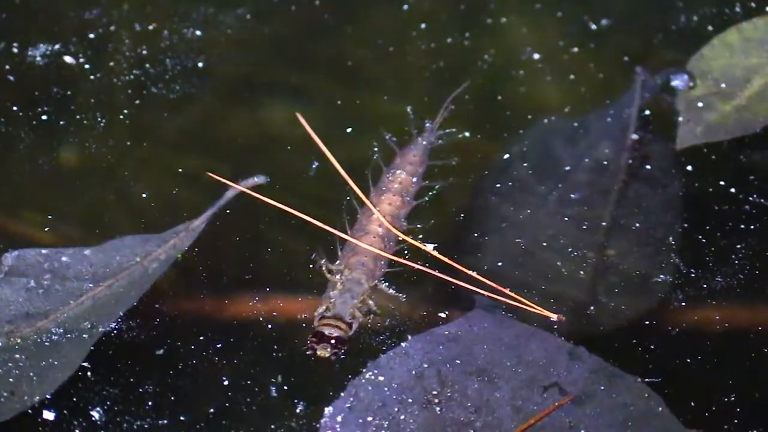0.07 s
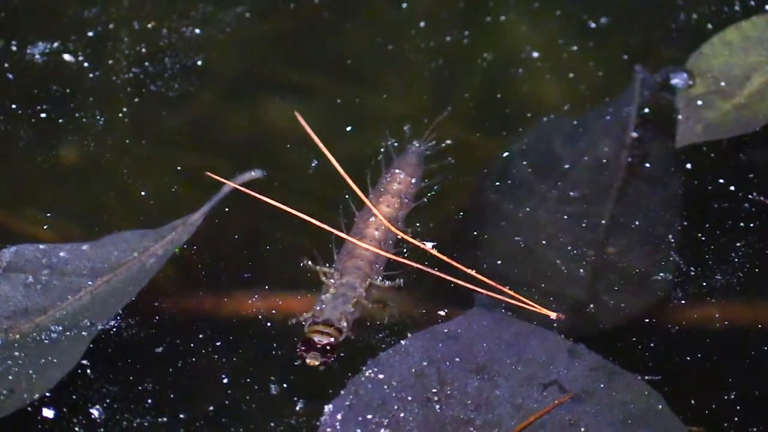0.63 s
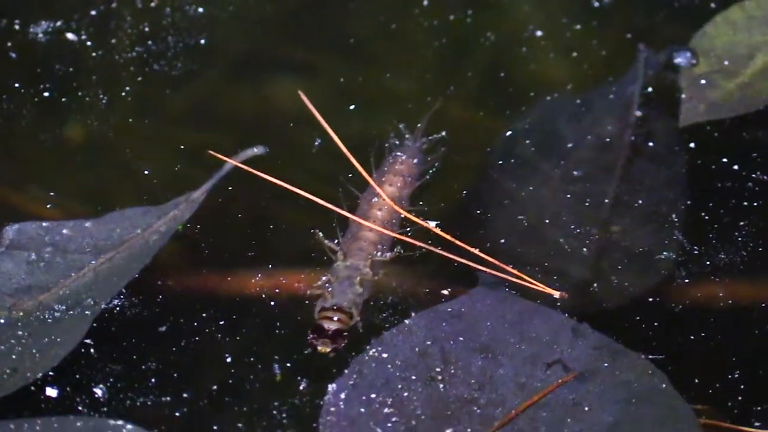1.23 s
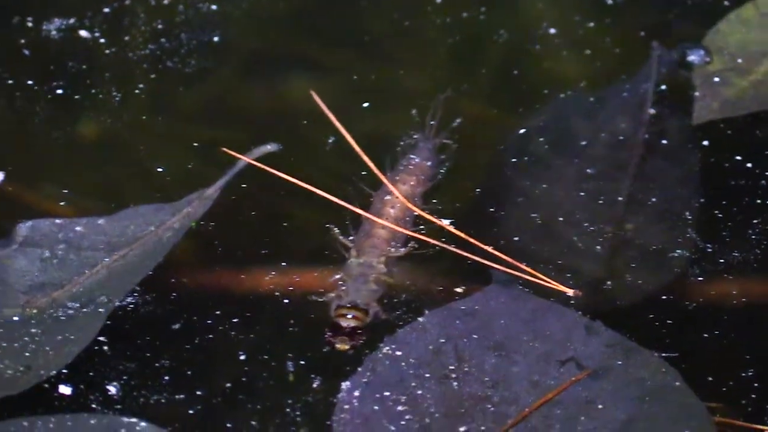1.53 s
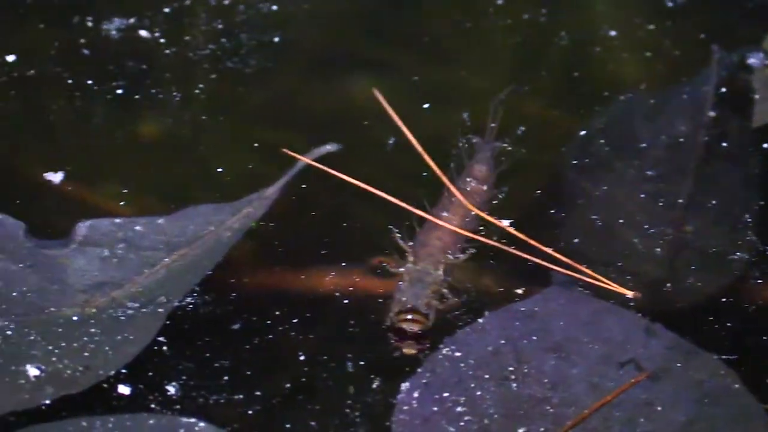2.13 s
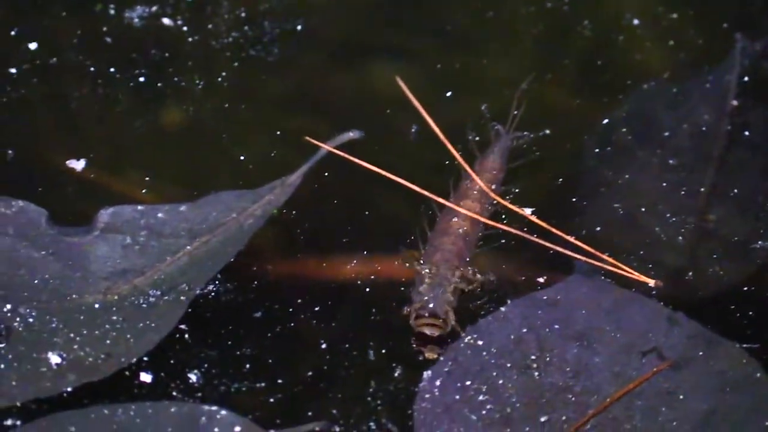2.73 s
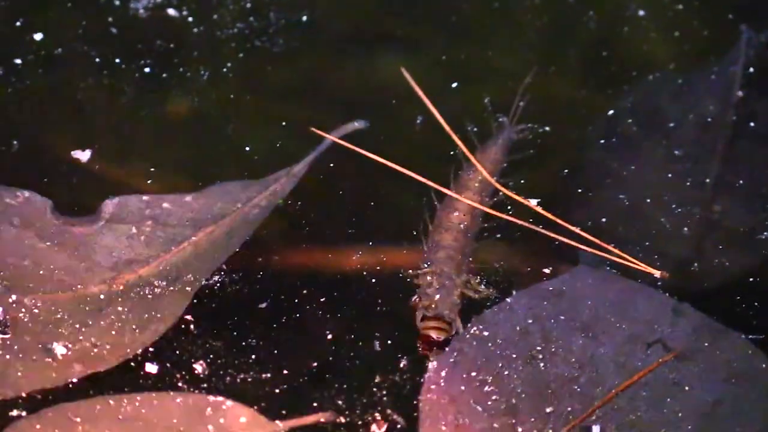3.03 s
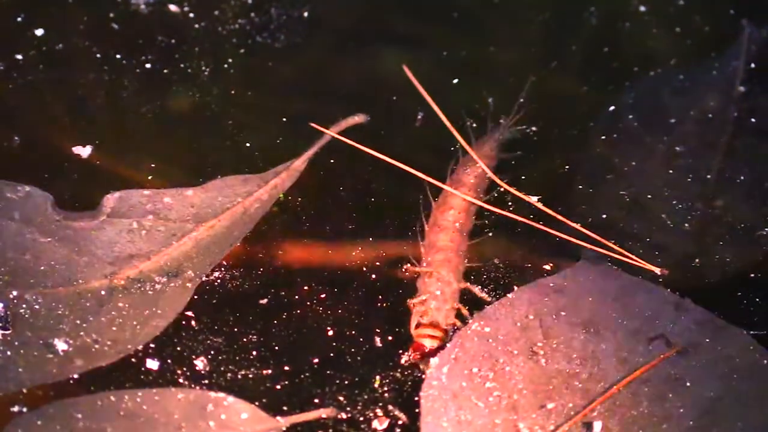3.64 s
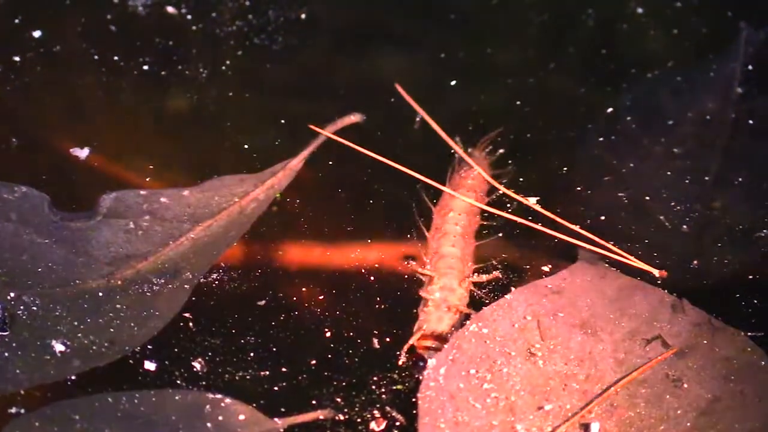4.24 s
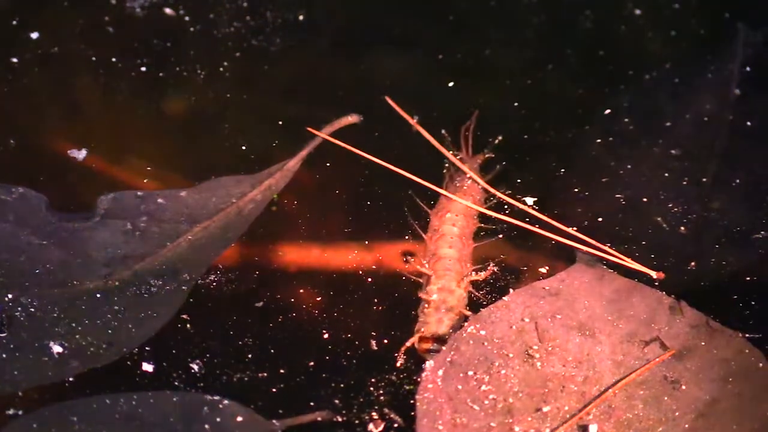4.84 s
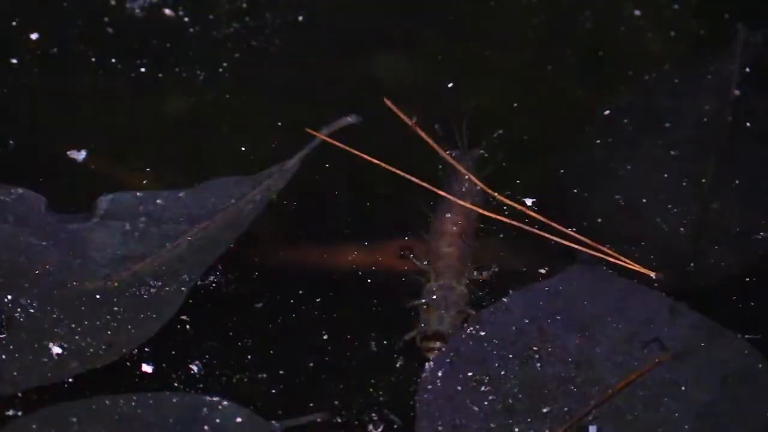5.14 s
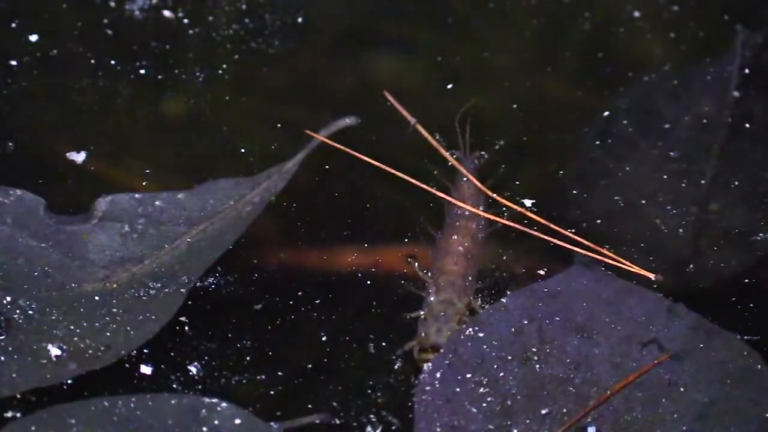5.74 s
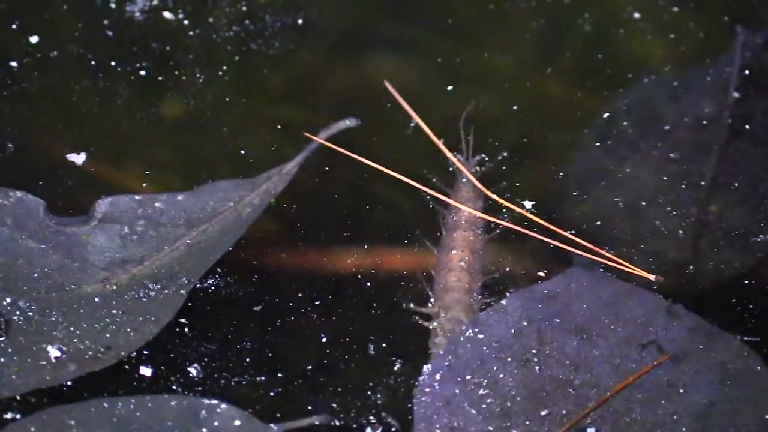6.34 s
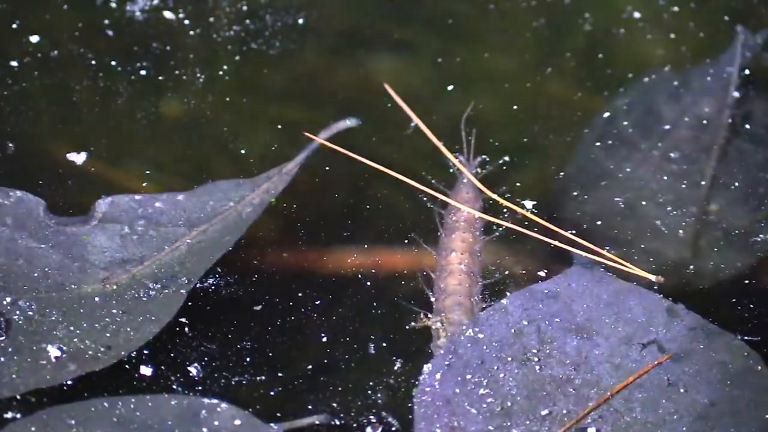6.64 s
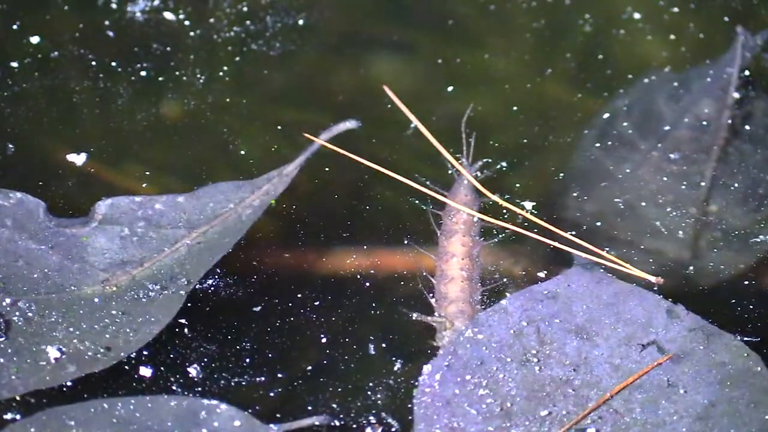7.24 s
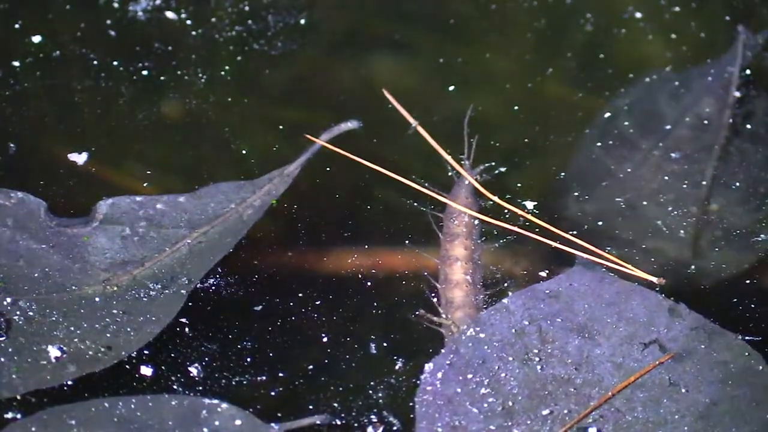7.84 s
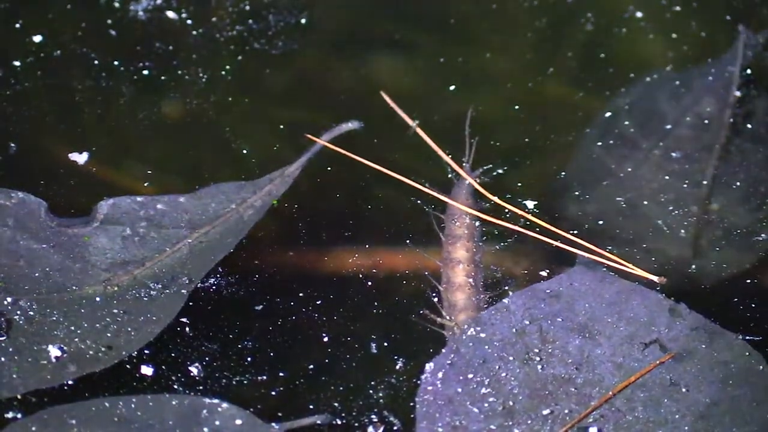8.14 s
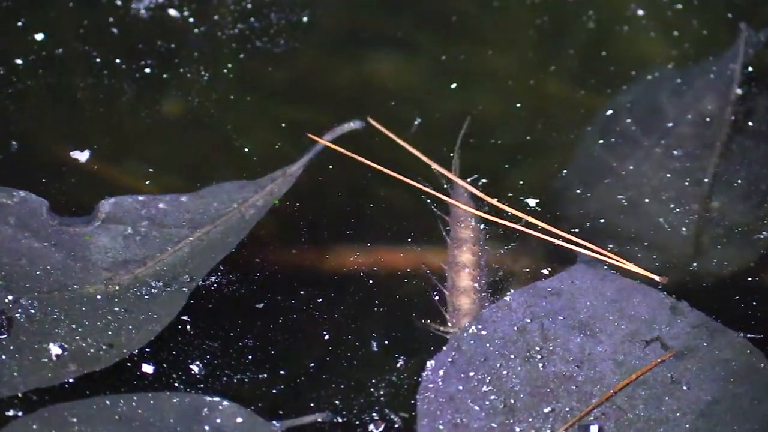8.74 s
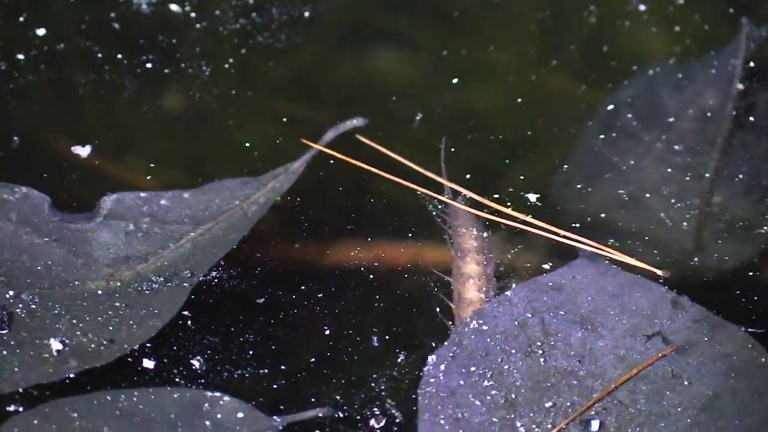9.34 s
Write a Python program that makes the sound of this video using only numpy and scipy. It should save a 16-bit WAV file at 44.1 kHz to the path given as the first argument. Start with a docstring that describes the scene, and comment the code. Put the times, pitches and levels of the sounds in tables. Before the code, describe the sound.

At a woodland pond at night, two frogs on the right trade short, high, rising whistles, each echoing briefly among the trees. A distant frog chorus shimmers steadily behind them over a faint murmur of air. Close to the microphone, cloth and dry leaves rustle, and a stick snaps sharply early on. In the second half only the louder frog keeps calling, while soft handling knocks and twig ticks gather.

```python
"""A far chorus of spring peepers shimmers over still night air at a woodland pond. A sleeve brushes dry
leaves close by, then two peepers trade calls on the right. Each peep is a rising whistle from the vocal
cords, radiated by the throat sac and scattered back by the trees. Cloth and leaf litter keep rustling,
with one sharp snap of a stick, soft handling knocks and, later, small ticks of twigs."""
import sys
import numpy as np
from scipy import signal
from scipy.fft import rfft
from scipy.io import wavfile

SR = 44100
rng = np.random.default_rng(int(sys.argv[2]) if len(sys.argv) > 2 else 0)


def int16_out(signal):
    """Quantize to a 16-bit WAV file."""
    q = np.round(np.clip(np.atleast_2d(signal).T, -1, 1) * 32767)
    wavfile.write(sys.argv[1], SR, q.astype(np.int16))


N = 413658
TIME = np.arange(N) / SR

# Colours of the air's murmur and hiss, of rubbing cloth and of crinkling leaves.
# Each row: frequency in Hz, relative level per Hz in dB.
MURMUR_SPECTRUM = [(22, -29), (45, -12), (75, -0.5), (110, 0.5), (145, -3.5), (190, 0.5), (250, -3),
                   (330, -2.5), (450, -5), (600, -2.5), (850, -1), (1400, -6.5), (2300, -14)]
HISS_SPECTRUM = [(2000, -8), (4000, -6.5), (6000, -7), (9500, -17), (12000, -13.5), (15800, -20.5)]
CLOTH_SPECTRUM = [(90, -22), (170, -8.5), (380, -1), (550, -3), (1000, -8.5), (1400, -6), (2400, -6.5),
                  (4000, -15.5), (5500, -31.5)]
LEAF_SPECTRUM = [(2800, 2), (4400, 4), (5900, -2), (8000, 2), (9800, -1.5), (11500, -15), (15800, -28)]
# Stereo width. Each row: frequency in Hz, left-right likeness from 0 (wide) to 1 (mono).
AIR_LIKENESS = [(30, .2), (60, 0.79), (120, 1), (300, 0.73), (700, 0.47), (1500, 0.37), (7000, 0.5),
                (15000, .4)]
RUSTLE_LIKENESS = [(100, 0.94), (300, 0.96), (1200, 0.61), (7000, 0.74), (15000, 0.38)]
# Level rides for the chorus, the faint constant fidgeting and the closing fade.
# Each row: time in seconds, gain in dB.
CHORUS_RIDE = [(0, -30.5), (1.3, -30), (2.1, -32.5), (3, -30.5), (4.8, -32.5), (6, -32), (7.5, -31.5),
               (9.3, -30.5)]
FIDGET_RIDE = [(0, -48.5), (1.4, -46.5), (2.1, -49.5), (3.3, -43), (6.9, -42), (7.55, -46.5), (8.2, -45),
               (9.3, -43)]
FADE = [(8.6, -1), (8.9, -3.5), (9.2, -9), (9.38, -14)]
# A sleeve sweeps the leaves. Each row: start and length in seconds, cloth and leaf gains in dB.
BRUSHES = [(0.146, 0.11, -42, -55.5), (0.883, 0.18, -35.5, -51), (1.533, 0.13, -36, -55),
           (2.4, 0.27, -46.5, -55.5), (3.183, .025, -36, -51), (3.342, 0.13, -38.5, -46.5),
           (3.669, 0.065, -39.5, -46), (3.946, 0.4, -41.5, -50.5), (4.743, 0.07, -36, -50),
           (5.036, 0.15, -35, -49), (5.521, 0.087, -26, -39.5), (5.662, 0.26, -33, -42.5),
           (5.988, 0.47, -37, -51), (6.288, 0.24, -30.5, -46.5), (6.624, 0.35, -32, -44),
           (8.42, 0.085, -35.5, -54.5), (8.66, 0.047, -42, -52)]

# Calls of the near frog and its slightly higher rival.
# Each row: start and length in seconds, bottom and top of the rise in Hz, level in dB before the push.
RIVAL_PEEPS = [(.564, 0.21, 2782, 3070, -8.5), (2.514, 0.23, 2765, 3063, -8), (4.285, .215, 2770, 3063, -8)]
NEAR_PEEPS = [(.894, 0.23, 2698, 2975, -2.5), (2.269, 0.24, 2715, 2975, -2.5),
              (3.630, 0.24, 2687, 2973, -2), (5.039, 0.24, 2742, 2990, -1.5), (6.507, .228, 2721, 2984, -2),
              (8.057, 0.23, 2729, 2965, -2)]
# The upward bend of a peep. Each row: share of the length, share of the rise.
GLIDE = [(0, 0), (.22, .28), (.4, .52), (.58, .76), (.76, .94), (.9, 1), (1, .98)]
# The push of air through a peep. Each row: share of the length, gain in dB.
RIVAL_PUSH = [(0, 0.5), (.14, 2.5), (.36, 3), (.6, -1.5), (.85, 0.5), (1, -15)]
NEAR_PUSH = [(0, -6), (.12, -3), (0.251, -2.5), (.46, 1.5), (.72, -0.5), (.92, -1.5), (0.999, -17.5)]
# What the sac radiates of the cords' other harmonics. Each row: frequency in Hz, dB against the whistle.
RIVAL_SAC = [(1450, -33.5), (2600, 5.5), (3200, 5), (4150, -34), (5700, -35.5), (6200, -30.5), (7000, -48),
             (7700, -34), (8700, -51.5), (10200, -57.5), (11300, -50.5), (12700, -42), (13900, -57)]
NEAR_SAC = [(1450, -39.5), (2600, -0.5), (3200, 1.5), (4100, -35.5), (4500, -35), (5700, -46.5),
            (7200, -44), (8600, -56), (10200, -56.5), (11800, -57.5), (13400, -73)]
# Slaps off bank and trunks. Each row: delay in seconds, left and right gains in dB.
RIVAL_ECHOES = [(0.045, -11.5, -14), (.097, -35, -21.5), (.123, -32, -15.5), (0.15, -22.5, -20.5)]
NEAR_ECHOES = [(0.068, -20, -29.5), (0.088, -36.5, -29), (.108, -30, -30)]

# One stick snaps; twigs and leaves tick.
# Each row: start in seconds, relative level in dB, blunt push in dB against the click.
SNAP = [(1.6938, 5, -6)]
TICKS = [(4.5248, -29.5, -3), (5.0626, -28, -2), (5.535, -22.5, -7), (5.8835, -29, -1), (6.0617, -34, -3),
         (6.446, -18, 6), (6.5169, -22, -5), (6.7521, -19.5, 2), (6.8922, -27, -1), (6.9537, -26, -5),
         (8.1257, -21.5, 4)]
# The ring of breaking wood. Each row: frequency in Hz, gain in dB, seconds to fall 60 dB.
TWIG_MODES = [(710, -27, 0.0047), (1300, -25, 0.0017), (2450, -5, 0.0026), (4440, -5, 0.0022),
              (5580, -8.5, 0.0018), (7600, -5, 0.0021), (10040, -10, 0.0023), (12800, -30, .001)]
# Soft handling knocks; the first row is the dull thud of the snapping stick's body. Each row: start in seconds,
# thud gain in dB, pitch in Hz, contact gain in dB.
KNOCKS = [(1.6943, -23.5, 258, -26), (3.2105, -21, 380, -12), (4.7856, -24, 250, -12.5),
          (4.998, -21, 353, -35), (5.0634, -18, 490, -14), (5.491, -24, 196, -25), (5.536, -22, 375, -21),
          (5.560, -14.5, 290, -28), (5.568, -17, 178, -19), (5.576, -17, 333, -29),
          (5.6207, -20.5, 328, -14), (6.137, -18, 870, -28), (6.349, -16, 415, -17), (6.446, -14, 890, -16),
          (6.462, -19, 430, -28), (6.752, -11, 1170, -18), (6.790, -18, 446, -24), (6.877, -23, 366, -28),
          (7.383, -19.5, 1620, -28), (9.149, -19, 350, -35)]


def from_db(db):
    """Decibels to gain."""
    return 10 ** (np.asarray(db) / 20)


def rms_one(x):
    """Scale to unit rms."""
    return x / np.sqrt(np.mean(x ** 2) + 1e-20)


def along(curve, at):
    """Read a curve whose points are joined by straight lines."""
    return np.interp(at, *np.transpose(curve))


def at_hz(curve, hz):
    """Read a curve on a log-frequency axis."""
    points_hz, values = np.transpose(curve)
    return np.interp(np.log(hz), np.log(points_hz), values)


def pan(right_db):
    """Left and right gains, with the right louder by right_db."""
    return from_db(np.array([[-.5], [.5]]) * right_db)


def band(x, low_hz, high_hz):
    """Butterworth band-pass."""
    sos = signal.butter(2, [low_hz, min(high_hz, .45 * SR)], "band", fs=SR, output="sos")
    return signal.sosfilt(sos, x)


def drift(rate_hz):
    """A random wander of about unit size that turns rate_hz times a second."""
    knots = rng.standard_normal(4000)
    return np.interp(TIME * rate_hz, np.arange(len(knots)), knots)


def add(track, start_s, sound):
    """Mix a sound into a track from start_s on."""
    i = int(np.clip(round(start_s * SR), 0, track.shape[-1] - 1))
    track[..., i:i + sound.shape[-1]] += sound[..., :track.shape[-1] - i]


def grainy_noise(spectrum, likeness, flicker_db, grain_db):
    """Stereo noise in narrow bands that flicker on their own and share millisecond grains; rms 1."""
    grain_sizes = np.minimum(rng.exponential(1, N // 32 + 1), 6)
    grains = np.repeat(from_db(grain_db * grain_sizes), 32)[:N]
    white = rng.standard_normal((2, 2, N)) * grains
    mid_side, edges_hz = 0, np.geomspace(22, 16000, 27)
    for k, (low, high) in enumerate(zip(edges_hz, edges_hz[1:])):
        hz = np.sqrt(low * high)
        if spectrum[0][0] <= hz <= spectrum[-1][0]:
            alike = at_hz(likeness, hz)
            gain = from_db(at_hz(spectrum, hz) + flicker_db * drift(25))
            mid_side += gain * band(white[k % 2], low, high) * np.sqrt([[1 + alike], [1 - alike]])
    mid, side = mid_side
    return rms_one(np.array([mid + side, mid - side]))


def night_air(murmur_db=-38, hiss_db=-53):
    """The bed: a soft, even murmur of far wind and a faint hiss."""
    murmur = grainy_noise(MURMUR_SPECTRUM, AIR_LIKENESS, flicker_db=1, grain_db=.5)
    hiss = grainy_noise(HISS_SPECTRUM, AIR_LIKENESS, flicker_db=-3, grain_db=-.5)
    return from_db(murmur_db) * murmur * pan(2.5) + from_db(hiss_db) * hiss * pan(1.5)


def whistle(length, bottom_hz, top_hz, push, edge_s=.011, scoop_hz=350, scoop_s=.003):
    """Pitch and envelope of one peep: it scoops up to its note, then rises as the sac fills."""
    t = np.arange(int(length * SR)) / SR
    hz = bottom_hz + (top_hz - bottom_hz) * along(GLIDE, t / length) - scoop_hz * np.exp(-t / scoop_s)
    gate = np.sin(np.pi / 2 * np.clip(np.minimum(t, length - t) / edge_s, 0, 1)) ** 2
    return hz, gate * from_db(along(push, t / length))


def woods(x, t60, build_s, top_hz):
    """Scatter from many trunks blooms and dies away, differently at each ear."""
    t = np.arange(int(1.3 * SR)) / SR
    tail = band(rng.standard_normal((2, len(t))), 300, top_hz)
    tail *= from_db(-60 * t / t60) * (1 - np.exp(-t / build_s))
    peep_band = np.abs(rfft(tail, SR)[:, 2700:3100])
    tail /= np.sqrt(np.mean(peep_band ** 2, axis=1, keepdims=True))   # unit gain at the frogs' pitch
    return signal.fftconvolve(np.atleast_2d(x), tail, axes=1)[:, :N]


def chorus(count=1100, bottom_hz=2860, rise_hz=200, spread_hz=190, uneven_db=3.5, off_pitch_db=-1.84):
    """Hundreds of far peeps, each with its own pitch and distance, blur into a wash among the trees."""
    calls = np.zeros((2, N + SR))
    hz, envelope = whistle(.19, bottom_hz, bottom_hz + rise_hz, NEAR_PUSH)
    for k, (jitter, detune, nearness, side) in enumerate(rng.standard_normal((count, 4))):
        peep = envelope * np.sin(2 * np.pi * np.cumsum(hz + spread_hz * detune) / SR)
        db = uneven_db * np.clip(nearness, -2, 1.5) + off_pitch_db * detune ** 2
        add(calls, (k + jitter) / count * (N / SR + 1), pan(6 * side) * from_db(db) * peep)
    calls = calls[:, SR // 2:SR // 2 + N]   # open with the chorus in full voice
    wash = from_db(-6) * calls + woods(calls, t60=1.0, build_s=.019, top_hz=6000)
    wash += .46 * wash.mean(axis=0)   # narrow the image
    return from_db(along(CHORUS_RIDE, TIME)) * pan(2.6) * rms_one(wash)


def brush(start, length, attack_s=.024, sag_db_per_s=11.5, release_s=.088):
    """Envelope of one sweep of the sleeve: a short swell, a sagging hold, a release."""
    t = np.maximum(TIME - start, 0)
    swell = np.sin(np.pi / 2 * np.minimum(t / attack_s, 1))
    release = np.exp(-np.clip((t - length) / release_s, 0, 20))
    return swell * from_db(-sag_db_per_s * t) * release


def rustle(crinkle_boost_db=5.5, fidget_leaves_db=-12.5):
    """Cloth rubs dully and dry leaves crinkle in fine grains; each brush rises out of the fidgeting."""
    power = from_db(along(FIDGET_RIDE, TIME) + np.array([[0], [fidget_leaves_db]])) ** 2
    for start, length, cloth_db, leaves_db in BRUSHES:
        power += (from_db([[cloth_db], [leaves_db]]) * brush(start, length)) ** 2
    cloth, leaves = np.sqrt(power)
    rub = cloth * grainy_noise(CLOTH_SPECTRUM, RUSTLE_LIKENESS, flicker_db=3, grain_db=3)
    crinkle = leaves * grainy_noise(LEAF_SPECTRUM, RUSTLE_LIKENESS, flicker_db=2.5, grain_db=2)
    return rub * pan(3.3) + from_db(crinkle_boost_db) * crinkle * pan(1.2)


def frog(peeps, push, sac, whistle_left_db, others_left_db, catch_db, catch_s):
    """The cords vibrate an octave under the whistle and rasp for an instant as they catch."""
    out = np.zeros((2, N))
    for start, length, bottom_hz, top_hz, db in peeps:
        hz, envelope = whistle(length, bottom_hz, top_hz, push)
        phase = 2 * np.pi * np.cumsum(hz) / SR
        catch = from_db(catch_db) * np.exp(-(np.arange(len(hz)) / SR / catch_s) ** 2)
        rasp = 1 + catch * np.sin(phase / 3)
        for k in range(1, 10):
            # harmonic 2 is the whistle, much fainter on the left; the others are more even between the ears
            ears = from_db([[whistle_left_db if k == 2 else others_left_db], [0]])
            sac_db = 0 if k == 2 else at_hz(sac, k * hz / 2)
            add(out, start, ears * from_db(db + sac_db) * envelope * rasp * np.sin(k * phase / 2))
    return out


def across_pond(voice, echoes, scatter_db, t60):
    """The direct call, a few dulled echoes, then the tail of the woods."""
    out, dulled = voice.copy(), band(voice[1], 500, 6400)
    for delay, left_db, right_db in echoes:
        add(out, delay, dulled * from_db([[left_db], [right_db]]))
    return out + from_db(scatter_db) * woods(voice[1], t60, build_s=.025, top_hz=5960)


def ring(x, hz, t60):
    """One damped mode of the wood: a unit click rings at height 1."""
    decay, angle = from_db(-60 / (t60 * SR)), 2 * np.pi * hz / SR
    return signal.lfilter([0, np.sin(angle)], [1, -2 * decay * np.cos(angle), decay ** 2], x + 1e-18)


def cracks(rows, gain_db, scatter_db, splinter_db, splinter_s):
    """Twigs and stalks break with a click that rings for milliseconds and hisses back from the woods."""
    clicks, t = np.zeros(N), np.arange(SR // 50) / SR
    push = np.exp(-t / .00007)   # a blunt contact feeds mostly the lower modes
    for start, db, blunt_db in rows:
        splinters = from_db(splinter_db) * rng.standard_normal(len(t)) * np.exp(-t / splinter_s)
        click = (t == 0) + from_db(blunt_db) * push / push.sum() + splinters
        add(clicks, start, from_db(db + gain_db) * click)
    wood = sum((-1) ** k * from_db(db) * ring(clicks, hz, t60)
               for k, (hz, db, t60) in enumerate(TWIG_MODES))
    scatter = woods(band(clicks, 2500, 12000), t60=.59, build_s=.003, top_hz=12500)
    scatter = signal.sosfilt(signal.butter(5, 10800, fs=SR, output="sos"), scatter)   # air takes the top
    return pan(2.7) * (wood + from_db(scatter_db) * scatter)


def knocks(contact_s=.00029, ring_cycles=14, scuff_db=-11, scuff_s=.011):
    """A knock is a brief hard contact, then a short damped thud with a scuff of rubbing."""
    out, t = np.zeros(N), np.arange(SR // 5) / SR
    for start, thud_db, hz, contact_db in KNOCKS:
        thud = np.sin(2 * np.pi * hz * t) * from_db(-60 * t * hz / ring_cycles)
        scuff = rms_one(band(rng.standard_normal(len(t)), hz / 2, hz + 1000)) * np.exp(-t / scuff_s)
        contact = from_db(contact_db) * np.exp(-t / contact_s)
        add(out, start, from_db(thud_db) * (thud + from_db(scuff_db) * scuff) - contact)
    return band(out, 115, 4500) * pan(3.5)


def scene():
    """Two frogs and small close movements up front, the chorus and night air behind."""
    near = frog(NEAR_PEEPS, NEAR_PUSH, NEAR_SAC,
                whistle_left_db=-16, others_left_db=-13.5, catch_db=-15, catch_s=.015)
    rival = frog(RIVAL_PEEPS, RIVAL_PUSH, RIVAL_SAC,
                 whistle_left_db=-21, others_left_db=-10.5, catch_db=-30.5, catch_s=.008)
    frogs = across_pond(near, NEAR_ECHOES, scatter_db=-20, t60=.92)
    frogs += across_pond(rival, RIVAL_ECHOES, scatter_db=-13, t60=1.0)
    ticks = cracks(TICKS, gain_db=5.5, scatter_db=-8.5, splinter_db=-11.5, splinter_s=.0015)
    snap = cracks(SNAP, gain_db=-4, scatter_db=4.5, splinter_db=-20.5, splinter_s=.0016)
    return frogs + chorus() + rustle() + knocks() + ticks + snap + night_air()


def record(dry, ceiling=1.0, attack_s=.0036, release_db_per_s=2.0, cutoff_hz=15600):
    """An overload clips briefly as a limiter ducks, then slowly lets go; the end fades, the top is cut."""
    over_db = np.maximum(20 * np.log10(np.abs(dry).max(axis=0) / ceiling + 1e-9), 0)
    recovery_db = release_db_per_s * TIME
    held_db = np.maximum.accumulate(over_db + recovery_db) - recovery_db
    lag = np.exp(-1 / (attack_s * SR))
    duck_db = signal.lfilter([1 - lag], [1, -lag], held_db)
    clipped = np.clip(dry * from_db(along(FADE, TIME) - duck_db), -ceiling, ceiling)
    return signal.sosfilt(signal.ellip(10, .1, 80, cutoff_hz, fs=SR, output="sos"), clipped)


dry = scene()
out = record(dry)
int16_out(out)
```